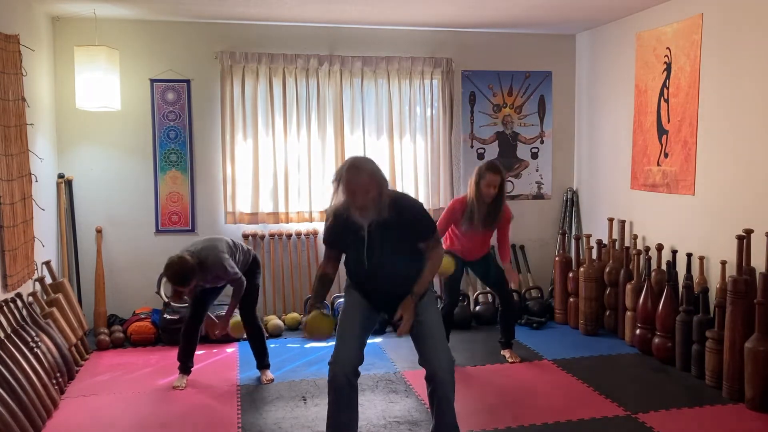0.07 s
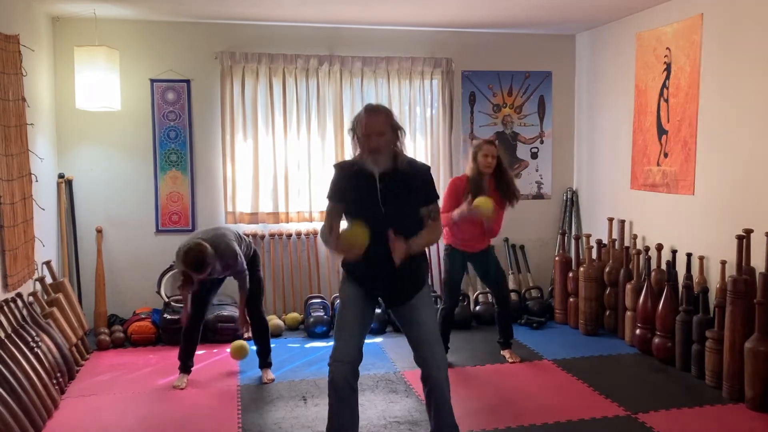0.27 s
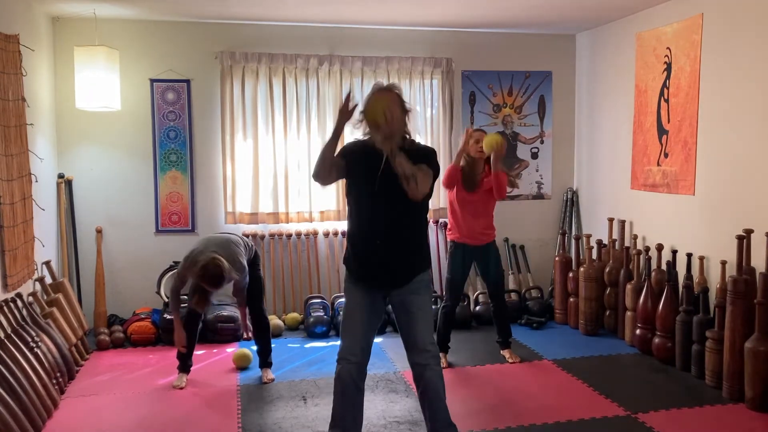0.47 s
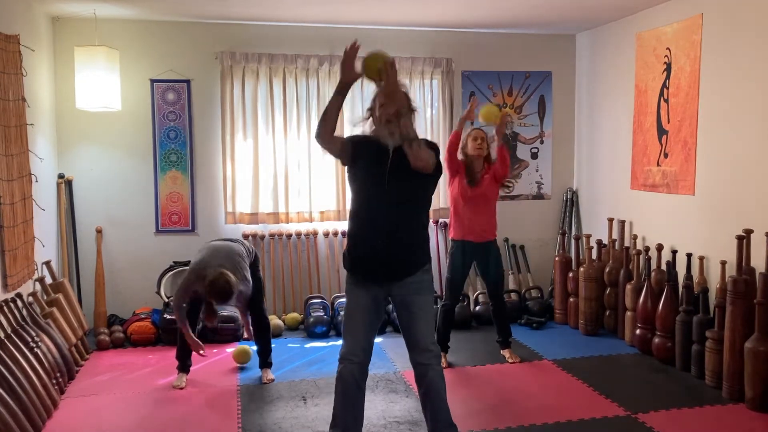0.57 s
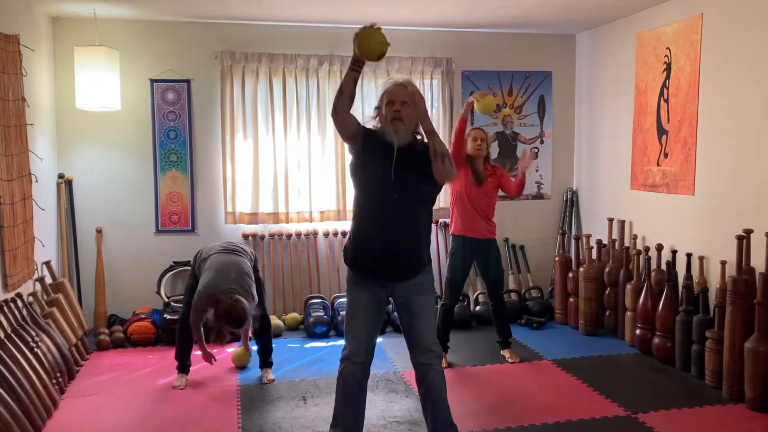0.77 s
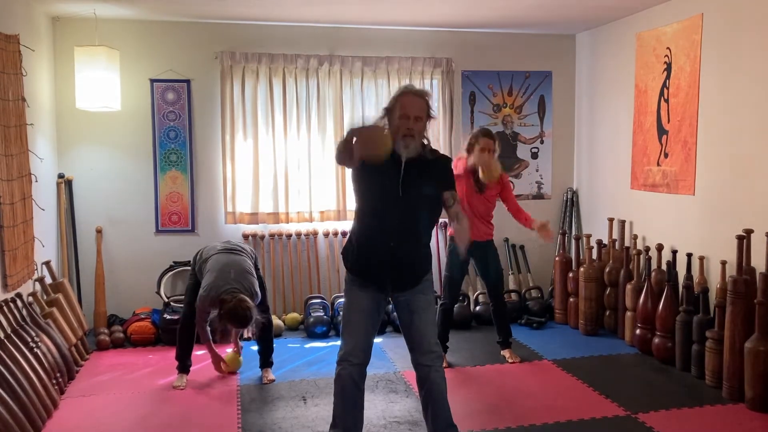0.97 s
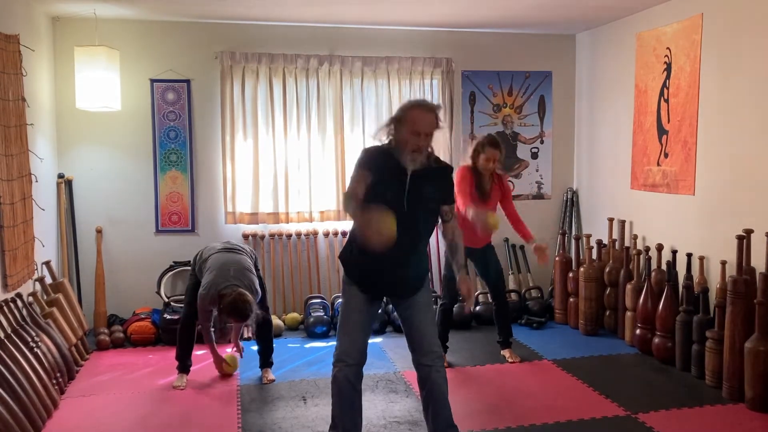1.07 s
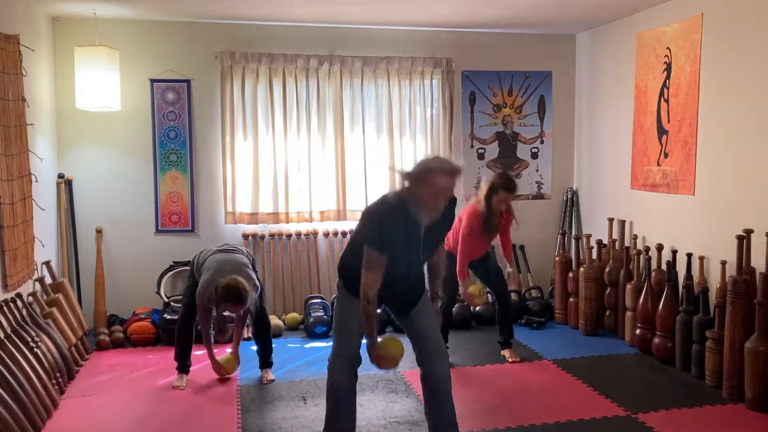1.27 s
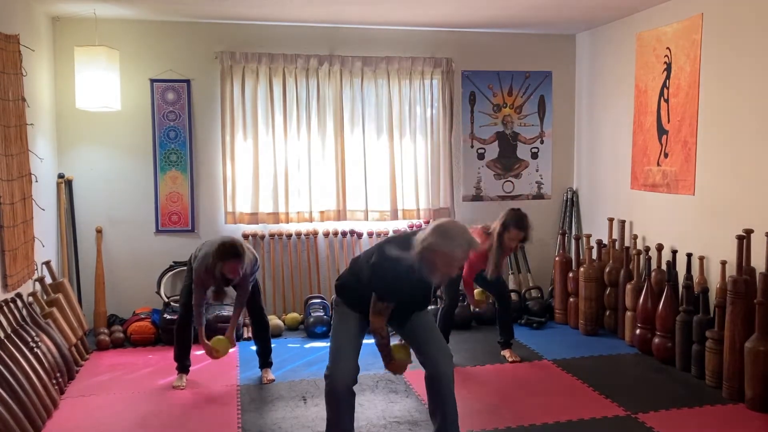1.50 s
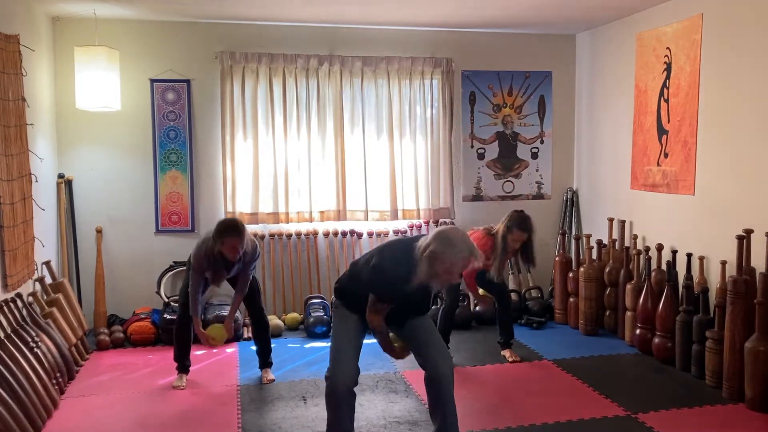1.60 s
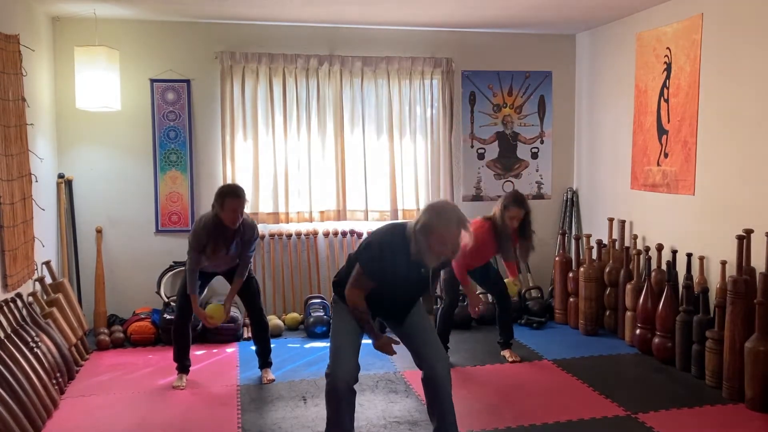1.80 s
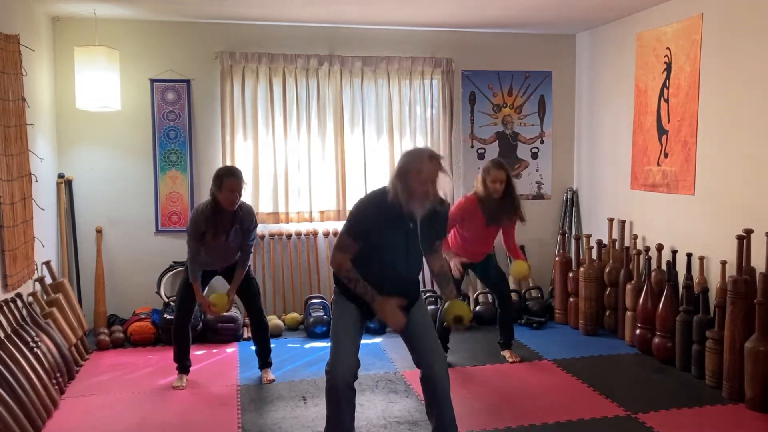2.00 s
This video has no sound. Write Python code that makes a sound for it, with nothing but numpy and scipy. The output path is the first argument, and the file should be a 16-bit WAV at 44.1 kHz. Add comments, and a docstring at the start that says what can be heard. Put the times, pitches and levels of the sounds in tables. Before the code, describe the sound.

Three fading thuds sound early as a weighted ball drops on a padded floor in a small room. Light smacks of hands catching other balls come around and after them, with faint clothing rustle and a low background hum.

```python
"""A small padded gym, where heavy soft balls are tossed and caught. One drops on the mat and bounces
twice: each impact gives a slap, a knock and a short thump, then the low ringing of the room's modes
and the boom of floor and room. Palms smack and grip other balls, which ring faintly, and clothes
rustle. A low hum and room rumble lie beneath, fading up as the recorder's noise suppression lifts."""
import sys
import numpy as np
from scipy import signal
from scipy.fft import rfft, irfft
from scipy.io import wavfile
from scipy.ndimage import uniform_filter1d

SR = 44100
rng = np.random.default_rng(int(sys.argv[2]) if len(sys.argv) > 2 else 0)


def generate_wav(signal):
    """Clip the signal to [-1, 1] and save it as 16-bit WAV at the path in sys.argv[1]."""
    frames = np.transpose(np.atleast_2d(signal))
    scaled = np.clip(frames, -1, 1) * 32767
    pcm = np.round(scaled).astype(np.int16)
    wavfile.write(sys.argv[1], SR, pcm)


N = 90404

# one ball's impacts on the mat (time [s], thump [dB], boom [dB], slap [dB], knock [dB])
LANDINGS = [(0.1924, 0.5, -2, -38, -31.5), (.4754, -6, -17, -51.5, -33), (.634, -18, -31, -79, -46.5)]
# palms meeting balls (time [s], level [dB], contact rise [s], treble roll-off [dB/octave], tick [dB])
CATCHES = [(.114, -77, 0.00077, -4, -61), (0.1906, -40.5, 0.003, 0.5, -44.5),
           (0.278, -49.5, 0.00077, -1.5, -45), (0.281, -45, 0.0015, 7, -70),
           (0.3798, -47.5, 0.0014, -1, -51.5), (0.4767, -52.5, .001, -2, -45.5),
           (0.727, -47, 0.00067, 0.5, -50), (0.7325, -40.5, 0.00046, 2, -38), (1.205, -53, 0.0048, -1, -60),
           (1.519, -51, 0.0024, 5.5, -49), (1.585, -55, 0.011, 5.5, -68), (2.026, -69, 0.0011, 4, -69)]
# normal modes (frequency [Hz], relative level [dB], delay [s], rise [s], T60 [s])
HOLLOW_MODES = [(2547, -13, 0.00191, 0.0025, 0.35), (2736, -20, 0.0034, 0.0049, 0.52),
                (3090, -31, 0.00209, .003, 1), (3444, -23, .002, .003, 0.74)]  # ball struck by a palm
THUMP_AND_ROOM_MODES = [(432, -22, 0.00104, 0.0014, 0.034), (171.4, -9, 0.01024, 0.0045, 0.072),
                        (150.8, -25, 0.0102, 0.003, 0.27), (192.8, -22.5, 0.02085, 0.004, 0.23),
                        (219.9, -31.5, 0.02253, 0.0067, 0.44), (268, -27, 0.0182, 0.0038, 0.16),
                        (304.2, -24.5, 0.019, 0.0021, 0.15), (356.1, -34, 0.01507, 0.022, 0.51),
                        (394.3, -30.5, .016, 0.0045, 0.26), (477.5, -42.5, 0.01233, 0.013, 0.34),
                        (490, -43.5, 0.013, 0.0027, 0.51), (518.6, -32.5, .004, 0.0017, 0.1),
                        (592.5, -45.5, 0.00226, 0.0034, 0.54)]  # thump of the landing and the room's low ringing after it
BOOM_MODES = [(46.03, -9.5, 0.03654, 0.022, 0.41), (61.87, -6.5, 0.0419, 0.049, 0.38),
              (82.2, -18.5, 0.0169, 0.049, 0.396), (44.4, -22, 0.1553, 0.066, 0.56),
              (56.64, -39.5, 0.1031, .06, 1.5)]  # floor and room
# partials of the hum (frequency [Hz], level [dB])
HUM_PARTIALS = [(114.5, -48), (172, -64.5), (230, -60), (269, -67.5)]
# gains as the noise suppression lifts (time [s], hum fundamental [dB], rush [dB], rumble [dB])
SUPPRESSION_GAINS = [(0, -27, -2.5, -8.5), (.45, -10, -2.5, 5.5), (.7, -3.5, -4, 3), (1.0, -2, -0.5, 0.5),
                     (1.5, -2.5, -0.5, -2.5), (2.05, 1.5, 1, 0)]
# rustle of clothes (time [s], level [dB])
RUSTLE_LEVEL = [(0, -68), (.09, -71), (.13, -67), (.45, -58), (.61, -70), (.65, -62), (.72, -62.5),
                (.93, -73.5), (1.0, -63), (1.07, -69.5), (1.19, -68), (1.36, -62.5), (1.5, -63.5),
                (1.6, -54.5), (1.71, -71), (1.79, -63.5), (1.94, -80.5), (2.05, -74)]
# noise spectra (frequency [Hz], relative spectral density [dB])
RUSH_SPECTRUM = [(20, -43), (60, -30), (150, -11), (260, -5.5), (400, -10), (700, -9.5), (1050, -9.5),
                 (1600, -17.5), (2500, -30), (5000, -45), (9000, -54), (16000, -64)]  # airy rush of the room
RUMBLE_SPECTRUM = [(10, -46), (25, -7), (40, -5.5), (60, 5.5), (90, -2.5), (160, -5), (260, -22),
                   (600, -55)]  # deep rumble of the room
CLOTH_SPECTRUM = [(300, -1), (1500, 13), (2500, 7), (5000, 3), (7000, 4.5), (9500, 6.5), (12000, 2),
                  (16000, -0.5)]  # rubbing clothes
PALM_SPECTRUM = [(80, -51), (250, -8), (700, -6), (1050, 3), (1500, -1.5), (2200, 2.5), (2530, 3.5),
                 (2800, 0), (3200, 4.5), (4800, 0.5), (6500, -2.5), (8500, 1), (12000, -3.5), (16000, -9.5)]  # smack of a palm
TICK_SPECTRUM = [(1500, -1), (4000, -11), (7000, 9.5), (10000, 8), (16000, -6.5)]  # crisp onset of a catch
SCATTER_SPECTRUM = [(20, -48), (60, -43), (110, -5), (170, -3), (300, -5), (500, -5.5), (620, -20),
                    (900, -30), (2000, -55)]  # thump scattered round the room
SLAP_SPECTRUM = [(150, -41), (400, 5), (700, 8.5), (1000, 9), (1400, 0.5), (2000, -5.5), (4000, -79),
                 (16000, -47)]  # ball's skin on the mat
KNOCK_SPECTRUM = [(50, -47), (200, -14), (400, 7), (560, -5), (700, -5), (850, -22), (1200, -15),
                  (1600, -25), (2500, -50), (8000, -65)]  # knock on the mat
# likeness of left and right in the sound field (frequency [Hz], correlation [0..1])
COHERENCE = [(60, 0.96), (180, .72), (380, 0.66), (700, 0.19), (1400, 0.059), (3500, 0.073), (6000, 0.42),
             (8500, 1)]
# stereo balance (frequency [Hz], left minus right [dB])
BALANCE = [(40, -3.5), (130, -0.5), (300, -2.8), (700, 1), (1400, 2.1), (3000, 2), (7000, 0), (16000, 0)]

RUSH_DB, RUMBLE_DB = -54.5, -52.5
RUSH_WAVER_DB, HUM_WAVER_DB, HUM_DRIFT_FRACTION = 0.4, 1.22, 0.00744
GRAIN_DB, GRAINS_PER_S = 0.5, 100
ECHO_DB, ECHO_DELAYS_S = -15.5, (0.002029, 0.022)
CONTACT_DECAY_S, REVERB_DB = 0.018, -2
ROLLOFF_FROM_HZ, MAX_COHERENCE = 700, 0.96
SCATTER_DB, THUMP_RIGHT_LAG_S = -27.5, 0.00035
RIGHT_LEAD_S, LEAD_FROM_HZ, CUTOFF_HZ = 0.000219, 2300, 15800

TIME_S = np.arange(N) / SR
BIN_HZ = np.maximum(np.arange(N // 2 + 1) * SR / N, 1)


def undb(db):
    """Amplitude ratio: a factor of ten for every 20 dB."""
    return 10 ** (np.asarray(db) / 20)


def over_frequency(table):
    """Interpolation of a curve on a log-frequency axis, at every spectral bin."""
    hz, value = np.array(table, float).T
    return np.interp(np.log(BIN_HZ), np.log(hz), value)


def over_time(table, column=1):
    """Linear interpolation of one column, at every sample."""
    rows = np.array(table, float)
    return np.interp(TIME_S, rows[:, 0], rows[:, column])


def waver(per_s):
    """Random modulation: a continuous curve with a standard deviation of 1."""
    size = max(int(SR / per_s), 1)
    steps = np.repeat(rng.standard_normal(N // size + 1), size)
    curve = uniform_filter1d(steps, size)[:N]
    return curve / curve.std()


def noise(spectrum, rolloff_db_per_octave=0):
    """Partial coherence: shared and opposed noise add to a coloured stereo field of rms 1."""
    mid, side = rfft(rng.standard_normal((2, N)))
    coherence = np.clip(over_frequency(COHERENCE), 0, MAX_COHERENCE)
    mid, side = mid * np.sqrt(1 + coherence), side * np.sqrt(1 - coherence)
    octaves = np.log2(np.maximum(BIN_HZ / ROLLOFF_FROM_HZ, 1))
    gain = undb(over_frequency(spectrum) - rolloff_db_per_octave * octaves)
    field = irfft(np.array([mid + side, mid - side]) * gain, N)
    return field / field.std()


def decay(start, rise_s, t60_s):
    """Exponential damping: an envelope that rises smoothly and loses 60 dB every t60_s."""
    age = np.maximum(TIME_S - start, 0)
    return (1 - np.exp(-(age / rise_s) ** 2)) * np.exp(-np.log(1000) * age / t60_s)


def modes(table, start):
    """Modal superposition: a blow excites damped sinusoids, each after its own delay."""
    out = np.zeros(N)
    for hz, db, delay, rise, t60 in table:
        onset = start + delay
        out += undb(db) * decay(onset, rise, t60) * np.sin(2 * np.pi * hz * (TIME_S - onset))
    return out


def smack(start, rise_s, t60_s, direct_db):
    """Incoherent addition: a brief contact and the room's reverberation sum in power to one envelope."""
    age = np.maximum(TIME_S - start, 0)
    direct = undb(direct_db) * np.exp(-age / CONTACT_DECAY_S)
    return decay(start, rise_s, t60_s) * np.hypot(direct, undb(REVERB_DB))


def reflections(sound, count=7):
    """Comb filtering: early echoes from walls and ceiling interfere with the direct sound."""
    delays = rng.uniform(*ECHO_DELAYS_S, (count, 1))
    comb = 1 + undb(ECHO_DB) * np.exp(-2j * np.pi * delays * BIN_HZ).sum(axis=0)
    comb_rms = np.sqrt(np.mean(abs(comb) ** 2))
    return irfft(rfft(sound) * comb / comb_rms, N)


def room_noise():
    """Broadband ambient noise: an airy rush and a deep rumble fade up as noise suppression lifts."""
    rush_db = RUSH_DB + over_time(SUPPRESSION_GAINS, column=2) + RUSH_WAVER_DB * waver(per_s=31.4)
    rumble_db = RUMBLE_DB + over_time(SUPPRESSION_GAINS, column=3)
    rush = reflections(noise(RUSH_SPECTRUM) * undb(rush_db))
    return rush + noise(RUMBLE_SPECTRUM) * undb(rumble_db)


def hum():
    """Random modulation: low partials waver; the fundamental fades up as noise suppression lifts."""
    out = np.zeros(N)
    for k, (hz, db) in enumerate(HUM_PARTIALS):
        drifting_hz = hz * (1 + HUM_DRIFT_FRACTION * waver(per_s=12))
        phase = 2 * np.pi * np.cumsum(drifting_hz) / SR
        suppression_db = over_time(SUPPRESSION_GAINS, column=1) if k == 0 else 0
        rms = undb(db + suppression_db + HUM_WAVER_DB * waver(per_s=10))
        out += np.sqrt(2) * rms * np.sin(phase)
    return out


def clothes():
    """Friction noise: a grainy rustle follows the throwers' movements."""
    return noise(CLOTH_SPECTRUM) * undb(over_time(RUSTLE_LEVEL) + GRAIN_DB * waver(GRAINS_PER_S))


def catches():
    """Impulsive excitation: a palm on a ball gives a tick, an echoed smack and an uneven hollow ring."""
    out = np.zeros((2, N))
    for start, db, rise, rolloff, tick_db in CATCHES:
        palm = noise(PALM_SPECTRUM, rolloff) * smack(start, rise, t60_s=0.42, direct_db=-3.5)
        flutter = np.array([waver(per_s=50), waver(per_s=50)])
        hollow = modes(HOLLOW_MODES, start) * flutter
        tick = noise(TICK_SPECTRUM) * decay(start, rise_s=0.00045, t60_s=0.031)
        out += undb(db) * (reflections(palm) + hollow) + undb(tick_db) * tick
    return out


def landings():
    """Inelastic impact: each weaker landing slaps, knocks, thumps and sets floor and room ringing."""
    out = np.zeros((2, N))
    for start, thump_db, boom_db, slap_db, knock_db in LANDINGS:
        thump = np.array([modes(THUMP_AND_ROOM_MODES, start + lag) for lag in (0, THUMP_RIGHT_LAG_S)])
        scatter = undb(SCATTER_DB) * noise(SCATTER_SPECTRUM) * decay(start, rise_s=0.0076, t60_s=0.41)
        boom = modes(BOOM_MODES, start)
        slap = noise(SLAP_SPECTRUM) * smack(start, rise_s=0.00033, t60_s=0.72, direct_db=4)
        knock = noise(KNOCK_SPECTRUM) * decay(start, rise_s=0.0018, t60_s=0.16)
        out += undb(thump_db) * (thump + scatter) + undb(boom_db) * boom
        out += undb(slap_db) * slap + undb(knock_db) * knock
    return out


def scene():
    """Linear superposition: the pressures of all the sources in the gym add."""
    return room_noise() + hum() + reflections(clothes()) + catches() + landings()


def record(dry):
    """Level and time differences at two close ports: bass leans right, treble reaches the right first."""
    edge_fade = signal.windows.tukey(N, 0.004)
    left, right = rfft(dry * edge_fade)
    lean = undb(over_frequency(BALANCE) / 2)
    lead = np.exp(2j * np.pi * RIGHT_LEAD_S * np.maximum(BIN_HZ - LEAD_FROM_HZ, 0))
    heard = irfft(np.array([left * lean, right * lead / lean]), N)
    lowpass = signal.ellip(10, 0.2, 80, CUTOFF_HZ, fs=SR, output="sos")
    return signal.sosfilt(lowpass, heard)


dry = scene()
out = record(dry)
generate_wav(out)
```